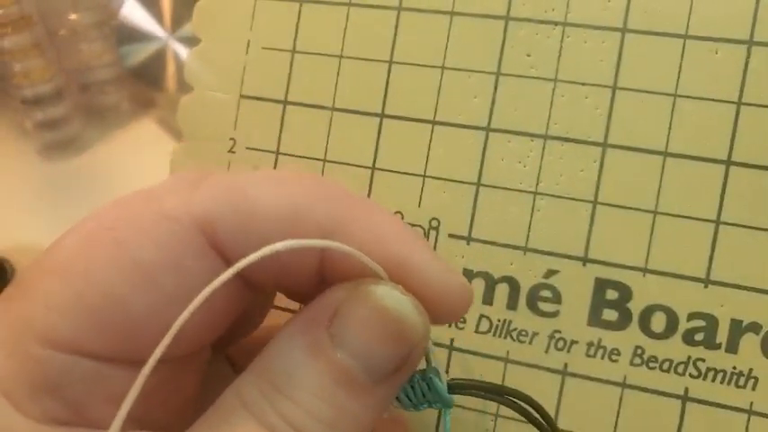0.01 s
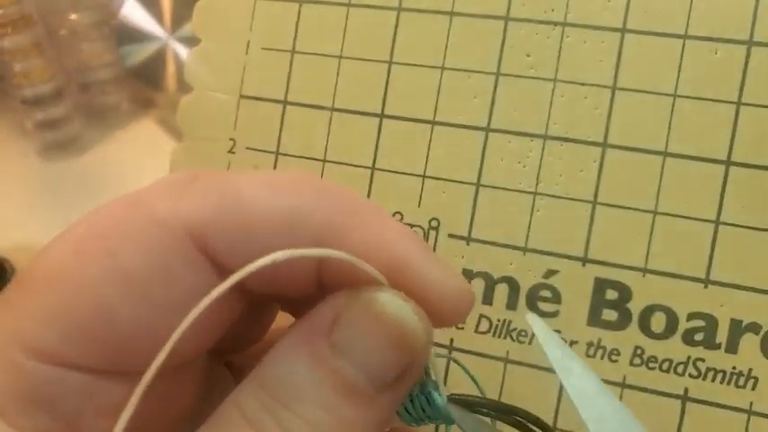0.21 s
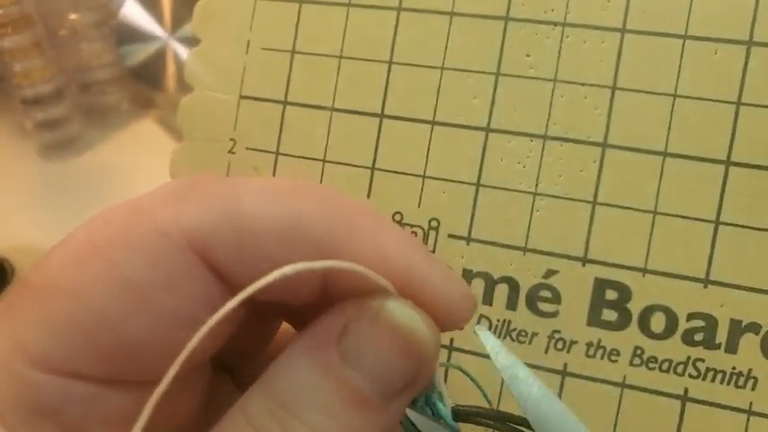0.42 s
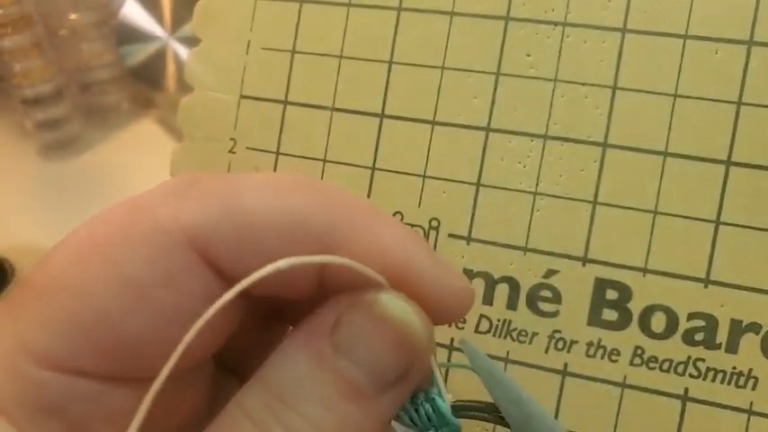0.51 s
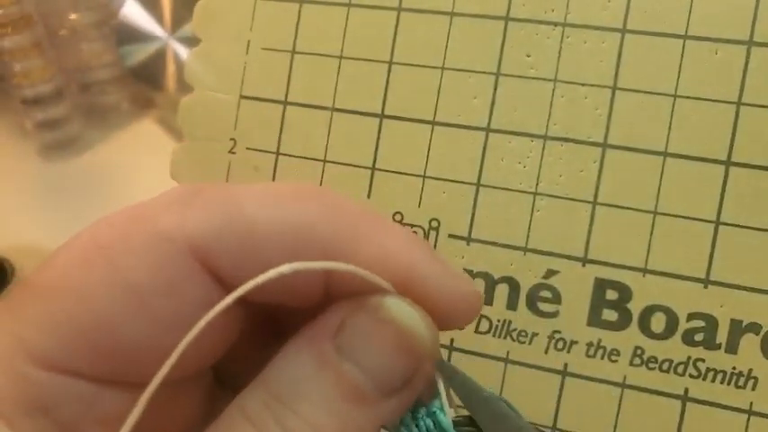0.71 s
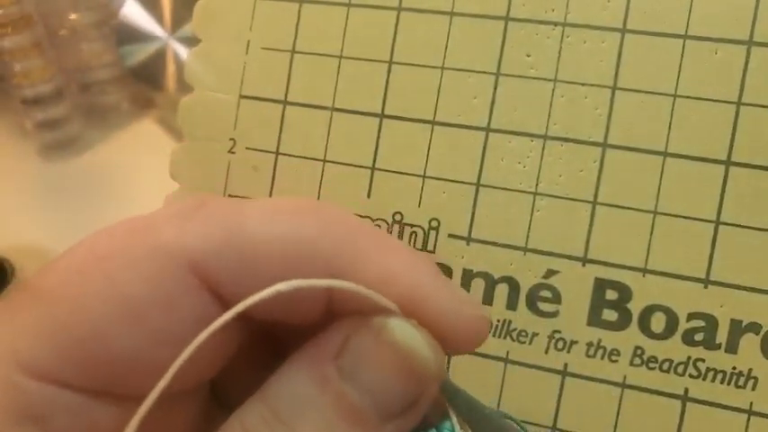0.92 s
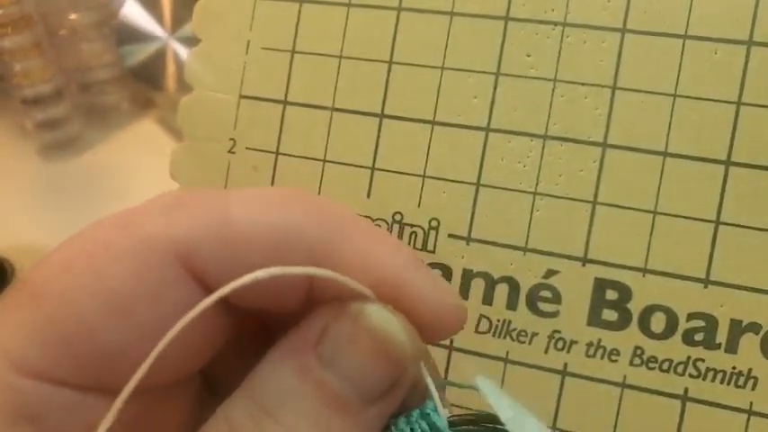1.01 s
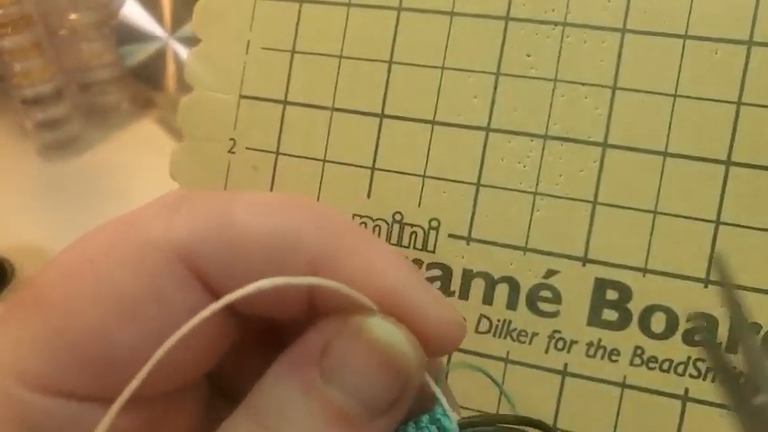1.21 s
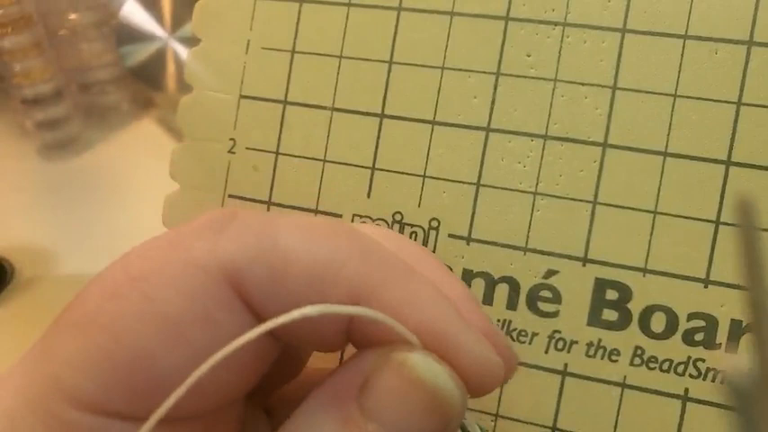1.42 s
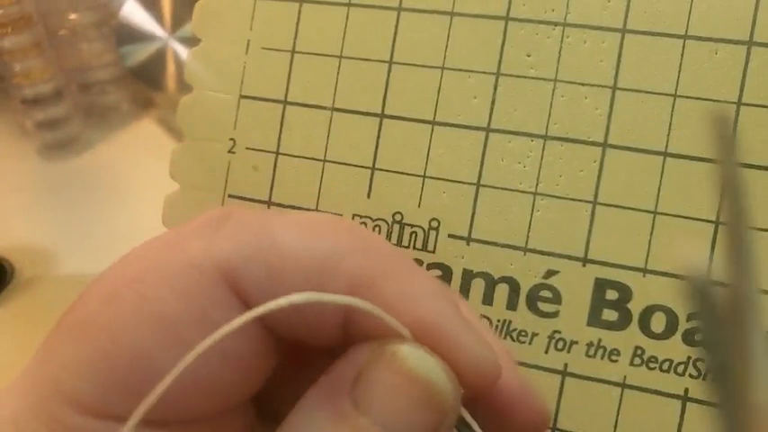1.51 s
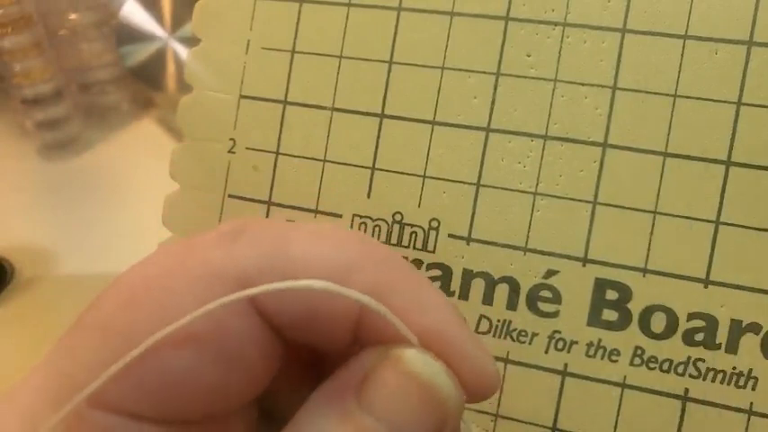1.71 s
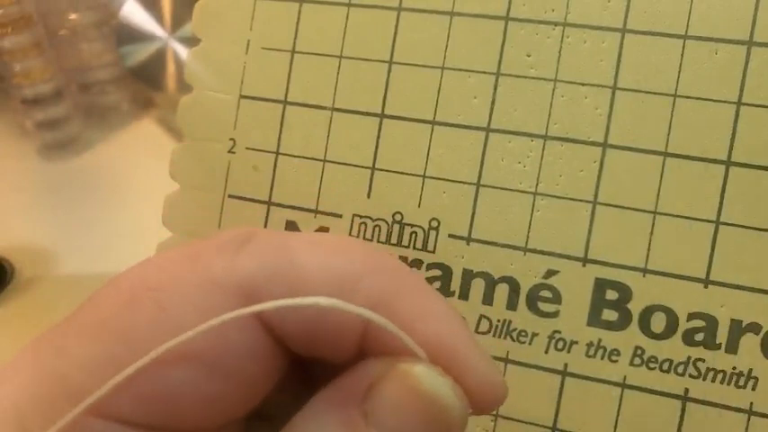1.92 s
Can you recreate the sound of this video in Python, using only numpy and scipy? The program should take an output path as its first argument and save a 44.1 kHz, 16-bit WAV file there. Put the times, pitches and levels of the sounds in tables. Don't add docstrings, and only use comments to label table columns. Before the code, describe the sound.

One bright scissor snip rings briefly, then soft handling clicks, faint thread rustle, dull board thuds and a brief metallic skid on the table, heard close in stereo indoors over low fan hum and hiss.

```python
import sys
import numpy as np
from scipy import signal
from scipy.fft import rfft, irfft, next_fast_len
from scipy.io import wavfile
from scipy.ndimage import map_coordinates

SR = 44100
rng = np.random.default_rng(int(sys.argv[2]) if len(sys.argv) > 2 else 0)


def transcribe(signal):
    frames = np.atleast_2d(signal).T
    limited = np.clip(frames, -1, 1)
    pcm = np.round(limited * 32767).astype(np.int16)
    wavfile.write(sys.argv[1], SR, pcm)


def gain_from_decibels(decibels):
    exponent = np.asarray(decibels, float) / 20
    return 10 ** exponent


N = 88200

# pitch_hz, level_db, t60_s
STEEL_MODES = [(861, 0.5, 0.1), (1072, -14, 0.06), (1303, -19, 0.111), (1617, -2.5, 0.1), (1800, -9, .08),
               (2069, -8.5, 0.057), (2202, -1, 0.14), (2255, -1, 0.089), (2340, -13.5, 0.04),
               (2570, -16.5, 0.061), (3142, -7.5, 0.1493), (3545, -27.5, 0.11), (3764, -5.5, 0.0609),
               (4510, -17, .06)]
FINGER_DAMPING = 0.57


def unit(x):
    return x / np.sqrt(np.mean(x ** 2) + 1e-20)


def along(points, hz):
    f, v = np.transpose(points)
    return np.interp(np.log(hz + 1), np.log(f + 1), v)


def level(rows):
    s, db = np.transpose(rows)
    return gain_from_decibels(np.interp(np.arange(N) / SR, s, db, left=-150, right=-150))


def wobble(rate):
    knots = rng.standard_normal(int(N * rate / SR) + 4)
    return map_coordinates(knots, [np.arange(N) * rate / SR])


def filtered(x, response):
    m = next_fast_len(N + SR // 2)
    return irfft(rfft(x, m) * response(np.fft.rfftfreq(m, 1 / SR)), m)[..., :N]


def body(peaks):
    def response(f):
        total = 0
        for k, (centre, width, db) in enumerate(peaks):
            loss = 1j * f * width
            total = total + (-1) ** k * gain_from_decibels(db) * loss / (centre * centre - f * f + loss)
        return total
    return response


def pan(db):
    return gain_from_decibels(np.array([[db / 2], [-db / 2]]))


def lag(f):
    port_lag_s = 0.00007
    return np.exp(-1j * np.pi * f * port_lag_s * np.array([[1], [-1]]))


def add(out, s, sound):
    seg = out[..., round(s * SR):][..., :sound.shape[-1]]
    seg += sound[..., :seg.shape[-1]]


def burst(t60, size=2000):
    near = rng.standard_normal((3, size))
    return (near[0] + 0.63 * near[1:]) * gain_from_decibels(-60 * np.arange(size) / SR / t60)


def slips(rate, spread_db):
    hits = (rng.random(N) < rate / SR) * gain_from_decibels(spread_db * rng.exponential(size=N))
    sign = np.sign(rng.standard_normal((2, N)) + 2 * rng.standard_normal(N))
    return unit(hits * sign + 0.019 * rng.standard_normal((2, N)))


def ring(modes, centre_hz, octaves, attack_s, knock_t60, damp):
    # pitch_hz, level_db
    side_curve = [(850, -17), (1500, -6), (2300, -1), (4400, 0)]
    lag_s, random_turn = 0.00041, 0.96
    pair_spread, sustain_db = 0.004, -19
    t = np.arange(SR // 3) / SR
    hz, db, t60 = np.transpose(np.repeat(modes, 2, axis=0))[..., None]
    turn = np.pi * hz * lag_s + random_turn * rng.standard_normal(hz.shape)
    hz = hz * (1 + pair_spread * rng.standard_normal(hz.shape))
    drive = np.exp(-(np.log2(hz / centre_hz) / octaves) ** 2)
    gain = gain_from_decibels(db + rng.normal(0, 1.12, hz.shape)) * drive
    decay = gain_from_decibels(-60 * t / knock_t60) + gain_from_decibels(sustain_db - 60 * t / (t60 * damp))
    fade = decay * (1 - np.exp(-(t / attack_s) ** 2))
    phase = 2 * rng.standard_normal(hz.shape)
    side = along(side_curve, hz) / 2
    both = np.array([
        np.sum(gain * gain_from_decibels(k * side) * fade * np.sin(2 * np.pi * hz * t + phase - k * turn), 0)
        for k in (1, -1)])
    return both / np.abs(both).max()


def crack_colour(f):
    return lag(f) * body([(4200, 4000, 0)])(f) ** 2 / (1 + (f / 8000) ** 12)


def snap():
    # start_s, peak_db, pitch_hz, spread_octaves
    contacts = [
        (.2066, -16, 2210, 1.33),
        (0.2094, -14.5, 2140, 1.02),
        (.2165, -24.5, 1900, 0.68),
        (.2295, -33, 2300, 0.6),
        (0.2364, -36.5, 2190, 0.73),
        (0.239, -45, 2000, 0.5),
        (.2445, -34, 2290, .6),
        (0.25, -46.5, 1890, 0.55),
    ]
    lead_s, lead_db = 0.016, -20.5
    out, crack = np.zeros((2, 2, N))
    first_s, first_db = contacts[0][:2]
    slide = ring(STEEL_MODES, 2000, 1.0, lead_s, 0.12, FINGER_DAMPING)
    add(out, first_s - lead_s, gain_from_decibels(first_db + lead_db) * slide)
    for s, db, hz, octaves in contacts:
        add(out, s, gain_from_decibels(db) * ring(STEEL_MODES, hz, octaves, 0.0007, 0.029, 0.99))
        add(crack, s, octaves * gain_from_decibels(db - 8) * burst(0.0103))
    return out + filtered(crack, crack_colour)


def clicks():
    # start_s, peak_db, pitch_hz
    contacts = [(0.054, -49, 1800), (0.063, -42, 1445), (0.074, -46, 1920), (0.078, -49, 1090),
                (.097, -61, 2900), (0.446, -61, 1490), (0.468, -55, 875), (.472, -58, 1600),
                (0.514, -57, 859), (.53, -54.5, 861), (0.559, -47.5, 861), (.561, -58.5, 1600),
                (0.589, -53, 861), (0.629, -54, 891), (.648, -63, 1650), (0.686, -52, 954),
                (.69, -63, 1650), (.71, -65.5, 1700)]
    out, contact_s = np.zeros((2, N)), 0.0032
    for s, db, hz in contacts:
        click = ring(STEEL_MODES, hz, 0.39, contact_s, 0.068, FINGER_DAMPING)
        add(out, s - contact_s / 2, gain_from_decibels(db - 3) * click)
    return out


def taps():
    # pitch_hz, level_db, t60_s
    laid_modes = [(859, 2.5, 0.1187), (1090, 4.5, 0.038), (1225, -2, 0.072), (1600, -18, 0.058),
                  (1760, 4, 0.063), (1925, 6.5, 0.16), (2029, 6, 0.13), (2345, -6, 0.12)]
    # start_s, peak_db, pitch_hz, left_over_right_db
    contacts = [(1.265, -61.5, 1870, 9.5), (1.3, -62.5, 2040, 7), (1.328, -54.5, 1200, 3.5),
                (1.37, -56.5, 1570, 4.5), (1.498, -58, 2160, 15.5), (1.576, -60, 1760, 13),
                (1.583, -57.5, 1970, 7.5), (1.607, -50, 1350, 5), (1.627, -44.5, 1020, -7),
                (1.63, -51, 1760, 4), (1.648, -52, 860, 14), (1.651, -55.5, 1740, 3), (1.666, -65, 900, -3),
                (1.92, -55.5, 2130, 5), (1.927, -54.5, 850, 4)]
    out, grit = np.zeros((2, 2, N))
    contact_s = 0.00471
    for s, db, hz, side_db in contacts:
        tap = ring(laid_modes, hz, 0.6, contact_s, 0.032, 1)
        add(out, s - contact_s / 2, gain_from_decibels(db + 3.5) * pan(side_db - 4) * tap)
        add(grit, s, gain_from_decibels(db - 1) * burst(0.06))
    return out + filtered(grit, lambda f: body([(1500, 2200, 0)])(f) ** 4)


def scrape():
    # time_s, level_db
    strokes = [
        [(1.695, -72), (1.716, -67), (1.728, -54), (1.746, -73), (1.752, -66), (1.771, -70), (1.778, -66),
         (1.79, -84), (1.82, -76)],
        [(1.82, -67.5), (1.842, -58), (1.848, -50.5), (1.857, -46), (1.868, -49), (1.874, -45.5), (1.884, -43),
         (1.889, -59), (1.93, -70.5)],
    ]
    # pitch_hz, width_hz, level_db
    resonances = [
        [(1217, 62, 1), (1800, 56, 4.5), (2570, 420, -4), (4300, 460, -12)],
        [(1220, 66, -7.5), (1799, 50, 2.5), (2666, 73, 1), (3625, 115, 3), (4670, 370, -3), (5470, 360, -3.5),
         (7700, 260, -24.5)],
    ]
    # start_s, peak_db
    stops = [
        (1.9014, -40.5),
    ]
    slips_per_s, air_levels_db = [380, 2900], [-40, -9.5]
    skid = 0
    for stroke, peaks, air_db, rate in zip(strokes, resonances, air_levels_db, slips_per_s):
        grit = slips(rate, 1.2) * level(stroke)
        skid = skid + gain_from_decibels(10.5) * filtered(grit, body(peaks))
        skid = skid + gain_from_decibels(air_db) * filtered(grit, body([(12200, 6200, 0.015)]))
    knock, crack = np.zeros((2, 2, N))
    for s, db in stops:
        add(knock, s, gain_from_decibels(db) * ring(STEEL_MODES, 2000, 1.0, 0.00089, 0.0064, 0.78))
        add(crack, s, gain_from_decibels(db + 5.5) * burst(0.016))
    return filtered(skid, lag) * pan(-7) + knock + filtered(crack, crack_colour)


def stutter():
    # start_s, peak_db, squeak_hz, squeak_over_tick_db
    catches = [(1.698, -63, 2330, -9), (1.7035, -65, 2330, -12), (1.7075, -61, 2280, -18),
               (1.7125, -65, 2450, -8), (1.716, -57.5, 2520, -2), (1.722, -53, 2495, 3.5),
               (1.7243, -59.5, 2560, 5), (1.7276, -50, 2597, -1.5), (1.731, -58.5, 2600, -6),
               (1.7337, -64, 2680, -12), (1.7374, -55.5, 2860, -1), (1.7484, -52, 2890, -6),
               (1.753, -61, 2830, -2), (1.758, -61, 2940, -10), (1.7739, -55, 1790, -6.5),
               (1.79, -73, 1750, -10), (1.7946, -62, 1890, -11), (1.8115, -60, 1970, -9),
               (1.823, -56.5, 1810, -14), (1.8275, -54, 1800, -15), (1.836, -55, 1810, -13),
               (1.8443, -49, 1820, -19), (1.8475, -58, 2660, -8), (1.864, -49, 2700, -12)]
    # pitch_hz, level_db
    tip_modes = [(3700, -1.5), (4050, -4), (4420, 2.5), (4950, -9.5), (5400, -22)]
    tick_t60, squeak_t60, attack_s = 0.018, 0.026, 0.00089
    out, t = np.zeros((2, N)), np.arange(SR // 20) / SR
    hz, db = np.transpose(tip_modes)[..., None]
    for s, peak_db, squeak_hz, squeak_db in catches:
        detune, phase, uneven, side = rng.standard_normal((4, len(tip_modes), 1))
        turn = 2 * np.pi * hz * (1 + 0.013 * detune) * t + 3 * phase
        gain = gain_from_decibels(db + 2.2 * uneven)
        tick = np.array([np.sum(gain * np.sin(turn + k * 0.68 * side), 0) for k in (1, -1)])
        tick = tick * gain_from_decibels(-60 * t / tick_t60 - 3)
        squeak = gain_from_decibels(squeak_db - 60 * t / squeak_t60) * np.sin(2 * np.pi * squeak_hz * t + 3 * phase[0])
        add(out, s, gain_from_decibels(peak_db + 3) * (tick + squeak) * (1 - np.exp(-t / attack_s)))
    return out * pan(-1.9)


def sing():
    # start_s, rise_s, t60_s, peak_db, pitch_hz
    notes_sung = [
        (.255, 0.013, 0.19, -43, 2281),
        (1.46, .006, 0.074, -66, 3360),
        (1.844, .004, 0.052, -60, 7700),
        (1.868, 0.018, 0.029, -14, 3613),
    ]
    sag = 0.17
    out, t = np.zeros(N), np.arange(SR // 4) / SR
    for s, rise, t60, db, hz in notes_sung:
        tone = np.sin(2 * np.pi * hz * (t - sag * t * t))
        add(out, s, gain_from_decibels(db - 60 * t / t60) * (1 - np.exp(-(t / rise) ** 2)) * tone)
    return filtered(out, lag) * pan(-1)


def handle_rub():
    # time_s, level_db
    rubbing = [(.44, -81), (.47, -78), (.7, -76.5), (.8, -88)]
    # pitch_hz, width_hz, level_db
    steel_peaks = [(1185, 85, -1.5), (1682, 94, -1.5), (1890, 54, -7)]
    return unit(filtered(slips(900, 2.8), body(steel_peaks))) * level(rubbing) * gain_from_decibels(2.94 * wobble(35.4))


def thread():
    # time_s, level_db
    sliding = [(.68, -85), (.75, -83.5), (.86, -77.5), (.95, -73), (1.05, -80.5), (1.14, -79.5),
               (1.18, -86)]
    # pitch_hz, width_hz, level_db
    resonances = [(4100, 210, -2), (5207, 197, -5)]
    # start_s, peak_db
    ticks = [
        (1.1292, -58.5),
    ]
    rustle = unit(filtered(slips(1600, 1.6), body(resonances))) * level(sliding) * gain_from_decibels(0.8 * wobble(41.3))
    tick = np.zeros((2, N))
    for s, db in ticks:
        add(tick, s, gain_from_decibels(db + 3.5) * burst(0.03))
    return rustle + filtered(tick, body([(11140, 16400, 0)]))


def board():
    # start_s, peak_db, pitch_hz
    thuds = [(0.208, -53.5, 292.7), (0.642, -47.5, 309), (0.686, -58.5, 315), (0.928, -53, 285.6),
             (1.075, -62.5, 297), (1.165, -52, 296.4), (1.27, -51.5, 251.5), (1.381, -54, 246),
             (1.479, -52, 320), (1.528, -56.5, 324), (1.556, -51.5, 315), (1.572, -43.5, 315),
             (1.628, -46, 298), (1.677, -51, 285)]
    # time_s, level_db
    pressure = [(0, -81), (.6, -75), (.85, -65.5), (1.2, -65), (1.45, -75.5), (1.6, -54), (1.75, -64.5),
                (2, -70.5)]
    # pitch_hz, width_hz, level_db
    resonances = [(230, 65, 5), (315, 35, 4), (356.6, 24, 2), (453, 53, -3.5)]
    thud_t60, overtone_t60, overtone_ratio, overtone_db = 0.097, 0.1, 1.62, -9.5
    out, t = np.zeros(N), np.arange(SR // 5) / SR
    for s, db, hz in thuds:
        overtone = np.sin(2 * np.pi * hz * overtone_ratio * t) * gain_from_decibels(overtone_db - 60 * t / overtone_t60)
        tone = np.sin(2 * np.pi * hz * t) + overtone
        add(out, s, gain_from_decibels(db - 60 * t / thud_t60) * (1 - np.exp(-t / 0.0044)) * tone)
    near = rng.standard_normal((3, N))
    creep = filtered(near[0] + 0.5 * near[1:], body(resonances))
    creep = unit(filtered(creep, body([(320, 122, 0)])))
    creep = creep * level(pressure) * gain_from_decibels(2.5 * wobble(22.34) - 3.5)
    return (out + creep) * pan(-9)


def noise(spectrum, alike):
    turn = np.arccos(np.clip(alike, -1, 1)) / 2
    both = filtered(rng.standard_normal((2, N)), lambda hz: gain_from_decibels(along(spectrum, hz)))
    mid, side = both * [[np.cos(turn)], [np.sin(turn)]]
    return unit(np.array([mid + side, mid - side]))


def fan():
    return gain_from_decibels(-63.5) * unit(filtered(rng.standard_normal(N), lambda f: body([(67.4, 17, 0)])(f) ** 2))


def mains_hum():
    # multiple, level_db, left_over_right_db
    partials = [(1, -59.5, -0.5), (2, -77, 10.5), (3, -90, -26), (8, -85, 13)]
    t, out = np.arange(N) / SR, 0
    for k, db, side_db in partials:
        tone = np.sin(2 * np.pi * k * 120 * t + k + 0.24 * wobble(7.13))
        out = out + gain_from_decibels(db + 0.5 + 1.5 * wobble(7.4)) * pan(side_db) * tone
    return out


def room_air():
    # pitch_hz, level_db
    rumble = [(12, -27), (20, -1.5), (123, -3), (153, -9), (195, -12.5), (308, -17.5), (500, -54),
              (650, -65), (1100, -120)]
    air = [(260, -28.5), (450, 0), (599, -11.5), (955, -5), (1060, -7), (2830, -13), (4050, -15.5),
           (7800, -18), (10100, -86), (17200, -120)]
    hiss = [(6500, -14), (7400, -2), (8000, -11), (8700, -13), (9400, -9.5), (10300, -7.5), (12000, -3),
            (15500, 0)]
    out = gain_from_decibels(-63) * noise(rumble, 0.58)
    out = out + gain_from_decibels(-71.5 + 0.3 * wobble(17)) * noise(air, -0.32) * pan(-2.7)
    return out + gain_from_decibels(-76) * noise(hiss, 0) * pan(-3)


def walls(x):
    # pitch_hz, t60_s
    decay = [(300, 0.065), (2200, 0.19), (5000, 0.16), (8000, 0.147)]
    hz, t, z = signal.stft(rng.standard_normal((2, SR // 3)), SR, nperseg=256)
    tail = signal.istft(z * gain_from_decibels(-60 * t / along(decay, hz)[:, None]), SR, nperseg=256)[1]
    late = np.pad(x, ((0, 0), (200, 0)))
    return signal.fftconvolve(late, tail / np.linalg.norm(tail[0]), axes=1)[:, :N]


def scene():
    # pitch_hz, level_db
    mic = [(6500, -1), (7800, -1.5), (8900, -6), (10500, -12), (13000, -5.5)]
    near = snap() + clicks() + taps() + scrape() + stutter() + sing() + handle_rub() + thread()
    wet = filtered(walls(near), lambda hz: 1 / (1 + (hz / 5000) ** 2))
    near = filtered(near + gain_from_decibels(-8) * wet, lambda hz: gain_from_decibels(along(mic, hz)) / (1 + (720 / (hz + 1)) ** 8))
    return near + board() + fan() + mains_hum() + room_air()


def band_limit(x):
    return signal.sosfilt(signal.butter(12, 15980, fs=SR, output="sos"), x)


def record(dry):
    mix = filtered(dry, lambda hz: hz < 15810)
    return band_limit(mix)


dry = scene()
out = record(dry)
transcribe(out)
```